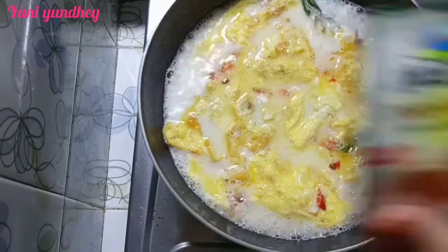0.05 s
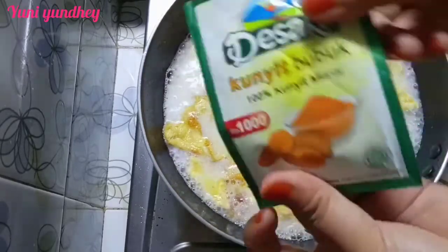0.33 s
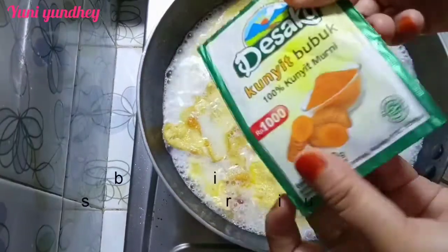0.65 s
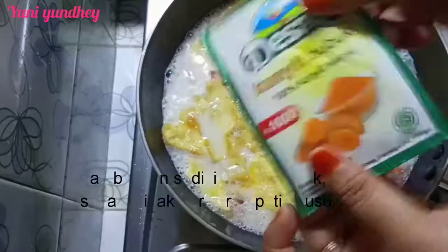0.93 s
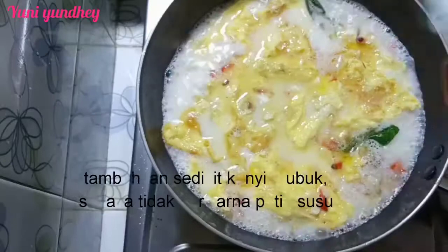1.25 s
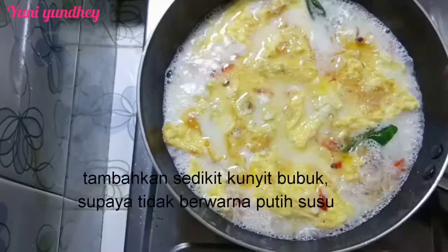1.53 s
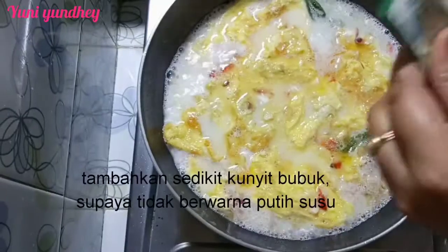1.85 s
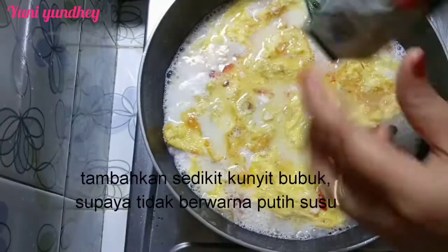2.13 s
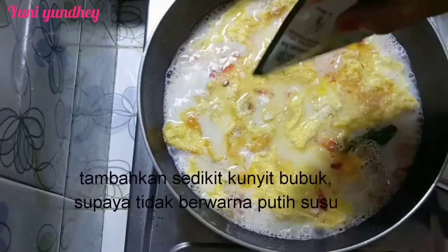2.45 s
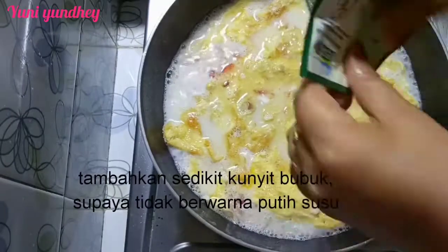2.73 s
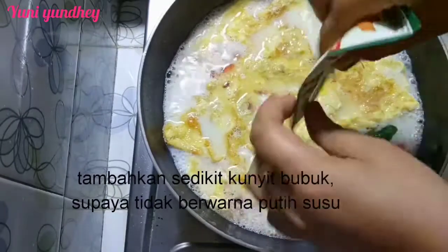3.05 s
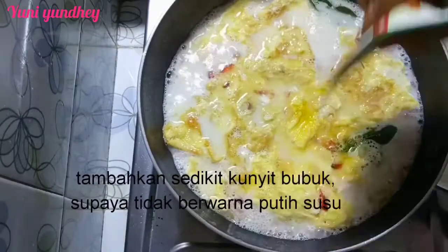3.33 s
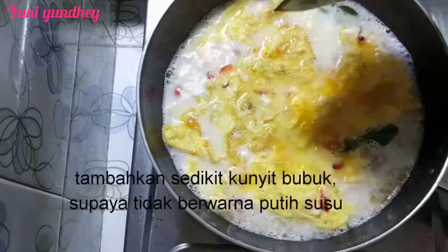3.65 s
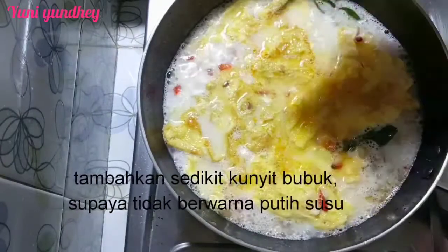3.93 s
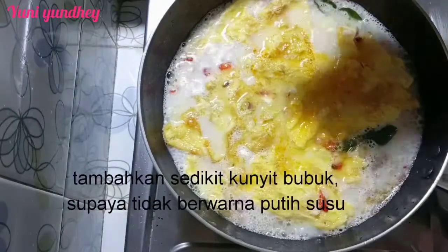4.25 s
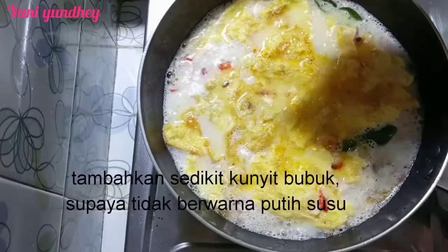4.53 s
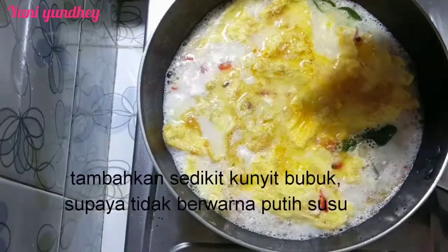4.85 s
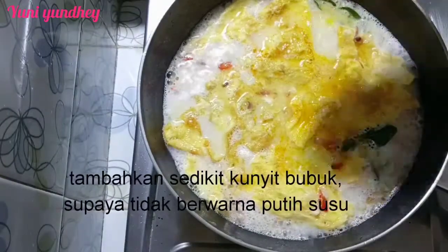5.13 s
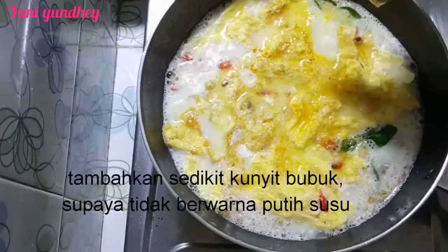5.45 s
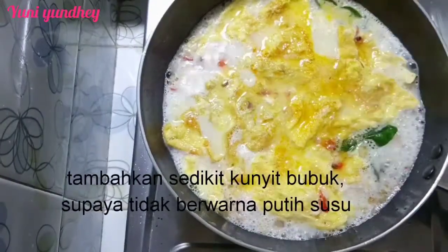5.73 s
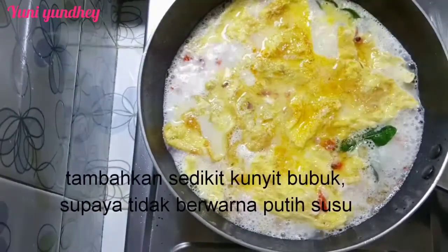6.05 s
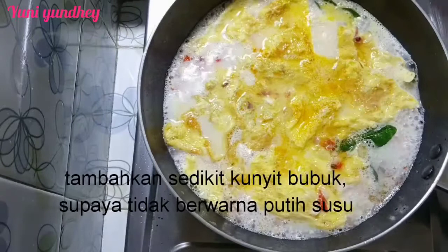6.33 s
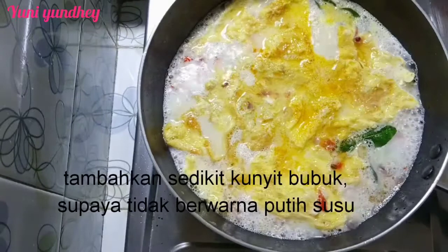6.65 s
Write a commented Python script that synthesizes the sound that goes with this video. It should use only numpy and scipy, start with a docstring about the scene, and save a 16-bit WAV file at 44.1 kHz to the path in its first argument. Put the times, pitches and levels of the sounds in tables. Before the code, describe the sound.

Close, crisp crinkling and snapping of a small foil packet being opened and emptied, while a pan simmers quietly in a kitchen.

```python
"""A pan simmers faintly while a foil spice sachet crackles close by, turned in the hands and torn open.
Each time the foil buckles it snaps and sets off smaller creases. Gripping fingers make it rustle,
bump it softly and squeak on it once. Shaken over the pan, it crackles finer and brighter; then it is
squeezed empty with more snaps. A small tiled kitchen rings after every snap."""
import sys
import numpy as np
from scipy import signal
from scipy.fft import rfft, irfft
from scipy.io import wavfile
from scipy.ndimage import uniform_filter1d

SR = 44100
rng = np.random.default_rng(int(sys.argv[2]) if len(sys.argv) > 2 else 0)


def inscribe(sig):
    """Save sig as 16-bit PCM at rate SR to the path in sys.argv[1].

    A 1-D sig is mono; a 2-D sig holds one channel per row.
    Samples are clipped to [-1, 1] before scaling.
    """
    pcm = np.round(np.clip(np.atleast_2d(sig).T, -1, 1) * 32767)
    wavfile.write(sys.argv[1], SR, pcm.astype(np.int16))


N = 295029
TIME = np.arange(N) / SR
LEAD_S = .008  # a crease starts to creak this long before it cracks


def undb(db):
    """Turn decibels into a gain, a number to multiply a sound by."""
    return 10 ** (np.asarray(db) / 20)


def unit(x):
    """Scale a sound to an average (rms) level of 1."""
    return x / np.sqrt(np.mean(x ** 2))


def add(track, sound, s):
    """Mix a sound into a track at s seconds."""
    start = max(int(s * SR), 0)
    track[start:start + len(sound)] += sound[:N - start]


def band(x, hz, kind, order=2):
    """Keep the "low" or the "high" side of a frequency."""
    return signal.sosfilt(signal.butter(order, hz, kind, fs=SR, output="sos"), x)


def response(points, size=512):
    """Turn (Hz, dB) rows into a tone colour: a short filter that favours some pitches over others."""
    hz, db = np.transpose(points)
    bins = np.maximum(np.fft.rfftfreq(size, 1 / SR), SR / size / 2)
    gains = undb(np.interp(np.log(bins), np.log(hz), db))
    cepstrum = irfft(np.log(gains))
    cepstrum[1:size // 2] *= 2  # folding this in half makes the filter ring only after a hit
    cepstrum[size // 2 + 1:] = 0
    impulse = irfft(np.exp(rfft(cepstrum)))
    return impulse / np.linalg.norm(impulse)


def ring(x, impulse):
    """Make every sample of a sound ring with the given shape."""
    return signal.fftconvolve(x, impulse)[:len(x)]


def clicks(per_s, spread_db):
    """Random clicks: many small ones, few large."""
    size = undb(spread_db * np.minimum(rng.exponential(size=N), 3))
    happens = rng.random(N) < per_s / SR
    return unit(happens * size * rng.choice([-1, 1], N))


# The tone of the fizz and of the boil. Each row: frequency in Hz, relative level in dB.
FIZZ_COLOUR = [(290, -44), (500, -0.5), (553, -1.5), (807, -6.5), (3540, -8.5), (5020, -13.5), (8090, -4.5),
               (11300, -19), (14900, -18), (16000, -36)]
BOIL_COLOUR = [(18, -59), (30, -16.5), (183, -6.5), (284, -8.5), (310, -10), (372, -15.5), (900, -26.5),
               (1170, -67), (1980, -120)]
# How the boil swells and sinks. Each row: time in seconds, relative level in dB.
BOIL_LEVELS = [(0, -51), (0.95, -58), (2.6, -52), (2.75, -63), (4.1, -59), (4.3, -53), (6.69, -59)]


def simmering_pan():
    """Tiny bubbles burst along the rim over a smooth hiss; the boil rumbles below."""
    hiss = rng.standard_normal(N)
    pops = undb(-6.5) * clicks(per_s=60, spread_db=6.5)
    fizz = ring(hiss + pops, response(FIZZ_COLOUR))
    boil = ring(rng.standard_normal(N), response(BOIL_COLOUR, size=4096))
    swell = undb(np.interp(TIME, *np.transpose(BOIL_LEVELS)))
    return undb(-61.5) * fizz + undb(-3.5) * boil * swell


# The tone of foil in the hands. Each row: frequency in Hz, relative level in dB.
HANDLED_COLOUR = [(24, -45.5), (40, -9.5), (231, -10), (354, -6.5), (556, -9), (751, -3.5), (1240, -4.5),
                  (2210, -1.5), (2700, -4), (3470, -2.5), (5440, -11), (7930, -1.5), (10200, -17),
                  (11800, -16.5), (16000, -22.5)]
# Fingers press and the foil rustles. Each row: start in seconds, length in seconds, relative level in dB.
FINGER_GRIPS = [(0.02, 0.28, -60), (1.33, 0.037, -48), (1.66, 0.32, -48), (2.03, 0.085, -41.5),
                (2.43, 0.024, -39), (4.1, 0.036, -39), (4.22, 0.042, -32.5), (4.35, 0.033, -33.5),
                (4.48, 0.028, -38), (4.6, 0.026, -37.5), (4.95, 0.24, -43.5), (5.49, .07, -39.5),
                (5.66, 0.15, -51.5), (6.08, 0.31, -48.5)]
# Clear snaps as the sachet is turned, torn and squeezed.
# Each row: start in seconds, relative level in dB, treble boost in dB (below zero is duller).
FOIL_SNAPS = [(0.035, -50, -4), (0.085, -40, 1), (0.162, -35, -2), (0.181, -32, -5), (0.2257, -23, 1.5),
              (0.2339, -23.5, 4.5), (0.304, -32.5, -12), (0.31, -23.5, 13), (0.487, -49.5, 1),
              (1.024, -48, 1), (1.1, -43, -13), (1.31, -39, 15), (1.352, -40, 23), (1.376, -38, 24),
              (1.406, -31.5, -3), (1.440, -32, 8), (1.5423, -34, -7), (1.590, -36.5, -6),
              (1.7147, -26.5, 1), (1.75, -22.5, 23), (1.773, -34.5, -2), (1.8518, -24, 2.5),
              (1.928, -28, -1), (1.935, -31, -1), (1.986, -23.5, -5), (2.0365, -19.5, 15),
              (2.048, -24.5, 33), (2.073, -32.5, 3), (2.147, -28, -5), (2.177, -21, 3.5),
              (2.226, -26.5, -3.5), (2.3082, -21, 0.5), (2.315, -19.5, 9.5), (2.339, -27.5, -2),
              (2.444, -27, 4), (2.451, -32, 3), (2.467, -28, -16), (2.5409, -29.5, 7), (2.618, -41, -30),
              (4.2475, -18.5, 17), (4.255, -23, 6.5), (4.2697, -21, 14), (4.322, -17, 7.5),
              (4.374, -23.5, 5), (4.396, -30.5, 19), (4.444, -27, -2), (4.488, -22.5, 5),
              (4.5067, -23.5, 4), (4.602, -20, 10.5), (4.625, -25, 4), (4.714, -29.5, 0),
              (4.7284, -23.5, 3.5), (4.7505, -22, 2.5), (4.8224, -18.5, 10), (4.835, -22, 15),
              (4.8627, -25.5, 3), (4.949, -34, -8), (4.964, -24, 6), (4.978, -24.5, 8), (5.0216, -30.5, 9),
              (5.048, -41, -9), (5.082, -26.5, 5), (5.1007, -25.5, 7), (5.243, -27, 11),
              (5.2636, -25.5, 21), (5.273, -28.5, 8), (5.331, -37, 12.5), (5.467, -40, -8),
              (5.4924, -32, 11), (5.5639, -30, -3), (5.628, -20.5, 4.5), (5.667, -20, 6),
              (5.8862, -26.5, 8.5), (6.074, -34, 0), (6.0948, -31, 3), (6.3138, -38.5, 5), (6.621, -44, 12)]


def handled_sachet():
    """Large panels of foil snap over a rustle; stiff folds are brighter and shorter than slack ones."""
    colour, snaps = response(HANDLED_COLOUR), np.zeros(N)
    for s, db, treble_db in FOIL_SNAPS:
        envelope = buckle(fade_s=.002 * undb(-.3 * treble_db), crack_db=-6, creak_db=-17)
        raw = snap(envelope, colour, panel_hz=2930, panel_db=0)
        body, treble = (band(band(raw, 4300, kind), 4300, kind) for kind in ("low", "high"))
        hit = set_level(body + undb(treble_db) * treble, db)
        add(snaps, kitchen(hit, wet_db=-7.5), s - LEAD_S)
    gripping = presses(FINGER_GRIPS, attack_s=.005, release_s=.054)
    flurries = undb(-19.5) * settling(FOIL_SNAPS, share=.75, rise_s=.003, fade_s=.015)
    crease = buckle(fade_s=.0017, crack_db=-3, creak_db=0)
    creases = rustle(gripping + flurries, crease, colour, per_s=260, spread_db=3.5, wet_db=-4)
    return undb(-1) * snaps + undb(-2.5) * creases


def presses(rows, attack_s, release_s):
    """How strongly the foil rustles under each push: it rises, holds and dies away."""
    gain = np.zeros(N)
    for s, length_s, db in rows:
        rise = np.clip((TIME - s) / attack_s, 0, 1)
        fall = np.exp(-np.maximum(TIME - s - length_s, 0) / release_s)
        gain += undb(db) * rise * fall
    return gain


def settling(rows, share, rise_s, fade_s):
    """How strongly small creases gather before each buckle and settle after, from a share of its dB."""
    kicks = np.zeros(N)
    for s, db, *_ in rows:
        kicks[int(s * SR)] += undb(share * db)
    before = signal.lfilter([0, 1], [1, -np.exp(-1 / (rise_s * SR))], kicks[::-1])[::-1]
    after = signal.lfilter([1], [1, -np.exp(-1 / (fade_s * SR))], kicks)
    return before + after


def rustle(gain, envelope, colour, per_s, spread_db, wet_db):
    """Many tiny creases give way at random, each a faint buckle."""
    creases = gain * clicks(per_s, spread_db)
    energy = ring(creases ** 2, envelope ** 2 / np.sum(envelope ** 2))
    energy = np.roll(np.abs(energy), -int(LEAD_S * SR))  # each crack lands on its click
    crackle = np.sqrt(energy) * rng.standard_normal(N)
    return kitchen(ring(crackle, colour), wet_db)[:N]


def buckle(fade_s, crack_db, creak_db, crack_s=.0003, creak_s=.0022):
    """The loudness shape of one buckle: the crease creaks, cracks through, and the panel rings out."""
    since_crack = np.arange(2048) / SR - LEAD_S
    t = np.abs(since_crack)
    creak = undb(creak_db) * np.exp(-t / creak_s)
    crack = undb(crack_db) * np.exp(-t / crack_s)
    return np.where(since_crack < 0, creak, crack + np.exp(-t / fade_s))


def snap(envelope, colour, panel_hz, panel_db):
    """One buckle as a burst of noise; each panel of foil has its own size and so its own pitch."""
    burst = ring(envelope * rng.standard_normal(len(envelope)), colour)
    hz = np.clip(panel_hz * 2 ** (.5 * rng.standard_normal()), 600, 13000)
    panel = signal.lfilter(*signal.iirpeak(hz, Q=5, fs=SR), burst)
    return burst + undb(panel_db) * panel


def set_level(x, db, span_s=.004):
    """Scale a snap by its average (rms) level just after it cracks."""
    start = int(LEAD_S * SR)
    crack = x[start:start + int(span_s * SR)]
    return x * undb(db) / np.sqrt(np.mean(crack ** 2))


def kitchen(x, wet_db, ring_s=.29, near_db=3, near_s=.0028):
    """Hob and pan echo at once and the tiled walls ring on; wet_db sets how loud the echoes are."""
    t = np.arange(int(ring_s * SR)) / SR
    walls = np.exp(-np.log(1000) * t / ring_s)
    nearby = undb(near_db) * np.exp(-t / near_s)
    echoes = rng.standard_normal(len(t)) * (walls + nearby) * (t > .002)  # new each time: the sachet moves
    room = undb(wet_db) * echoes / np.linalg.norm(echoes)
    room[0] = 1  # the direct sound
    return signal.fftconvolve(x, room)


# Soft bumps of the hands. Each row: start in seconds, relative peak level in dB.
HAND_BUMPS = [(0.232, -25.5), (0.49, -37), (1.377, -27), (1.668, -30), (2.176, -26.5), (2.31, -46),
              (2.51, -32), (6.41, -29)]


def hand_bumps(ring_hz=172):
    """Fingers meet the soft, full sachet with a dull bump that rings low."""
    out, t = np.zeros(N), np.arange(SR // 4) / SR
    fade = np.exp(-t / .013) + undb(-4.5) * np.exp(-t / .043)
    for s, db in HAND_BUMPS:
        push = rng.standard_normal(len(t)) * fade
        thud = band(band(push, 310, "low"), 106, "high", order=3)
        bump = thud + undb(2.5) * signal.lfilter(*signal.iirpeak(ring_hz, Q=15, fs=SR), thud)
        add(out, undb(db - 8.5) * bump / np.abs(bump).max(), s - .004)
    return out


# The note of the squeak. Its one row: pitch in Hz, relative level in dB.
SQUEAK_NOTE = [(7456, -42.5)]


def fingertip_squeak(start_s=1.336, length_s=.018):
    """Skin sticks and slips on the foil for a moment: a high, unsteady whistle."""
    hz, db = SQUEAK_NOTE[0]
    out, count = np.zeros(N), int(length_s * SR)
    waver = unit(uniform_filter1d(rng.standard_normal(N), size=64))[:count]
    tone = np.sin(2 * np.pi * np.cumsum(hz * (1 + .011 * waver)) / SR)
    add(out, undb(db + 5) * tone * signal.windows.tukey(count), start_s)
    return out


# The brighter tone of shaken foil. Each row: frequency in Hz, relative level in dB.
SHAKEN_COLOUR = [(24, -45), (40, -11), (269, -13.5), (312, -9), (1040, -8), (1680, -12), (2210, -7),
                 (4460, -7.5), (5580, -4.5), (10700, -4.5), (16000, -8)]
# Flicks of the foil as the powder is shaken out. Each row: start in seconds, relative level in dB.
FOIL_FLICKS = [(2.7032, -20.5), (2.7447, -16), (2.7902, -11.5), (2.8194, -26), (2.8544, -14.5),
               (2.886, -31), (2.9564, -14.5), (3.004, -13.5), (3.0553, -4.5), (3.0997, -21), (3.1298, -6.5),
               (3.1792, -14.5), (3.225, -19), (3.266, -13), (3.3243, -10.5), (3.3581, -14.5),
               (3.5276, -8.5), (3.551, -13), (3.5685, -21), (3.6147, -10), (3.652, -11.5), (3.7045, -16),
               (3.7359, -8.5), (3.8185, -10.5), (3.8733, -12.5), (3.933, -21.5), (4.0024, -19),
               (4.0532, -25), (4.0667, -14), (4.099, -26)]
# Runs of quick shaking. Each row: start in seconds, length in seconds, relative level in dB.
QUICK_SHAKES = [(2.745, 0.023, -37.5), (3.0, 0.12, -44.5), (3.4, .1, -37), (3.5, 0.41, -47),
                (3.94, 0.15, -34)]


def shaken_sachet(sharp_flick_db=-17):
    """Each shake flexes the foil: a dry, sharp tick in a flurry of finer ones."""
    colour, ticks = response(SHAKEN_COLOUR), np.zeros(N)
    for s, db in FOIL_FLICKS:
        crack_db = .95 * (db - sharp_flick_db)  # harder flexes crack more sharply
        envelope = buckle(fade_s=.0024, crack_db=crack_db, creak_db=-14)
        tick = set_level(snap(envelope, colour, panel_hz=6630, panel_db=11), db)
        add(ticks, kitchen(tick, wet_db=-13), s - LEAD_S)
    shaking = presses(QUICK_SHAKES, attack_s=.013, release_s=.011)
    # a harder flex puts more of its energy into the one tick, less into the flurry
    flurries = undb(-27.5) * settling(FOIL_FLICKS, share=.35, rise_s=.0056, fade_s=.013)
    crease = buckle(fade_s=.00045, crack_db=-8, creak_db=-11.5)
    creases = rustle(shaking + flurries, crease, colour, per_s=480, spread_db=2.8, wet_db=-9.5)
    return undb(-15) * ticks + creases


def scene():
    """Everything is straight ahead; only the foil's treble spreads sideways, more while it is shaken."""
    handled, shaken = handled_sachet(), shaken_sachet()
    middle = handled + shaken + fingertip_squeak() + hand_bumps() + simmering_pan()
    scatter = rng.standard_normal(128)
    scatter[:16] = 0  # only late, scattered sound differs between left and right
    foil = undb(-27) * handled + undb(-18) * shaken
    scattered = ring(foil, scatter / np.linalg.norm(scatter))
    side = band(scattered, 5370, "high", order=12)
    return np.array([middle + side, middle - side])


def record(dry, bass_hz=42, top_hz=16000):
    """The phone thins the deep bass and cuts the highest treble."""
    thin = band(dry, bass_hz, "high", order=1)
    return signal.sosfilt(signal.ellip(10, .2, 70, top_hz, fs=SR, output="sos"), thin)


dry = scene()
out = record(dry)
inscribe(out)
```